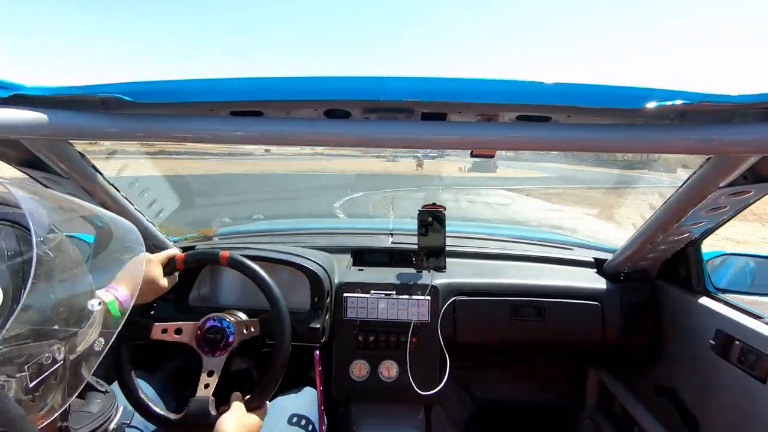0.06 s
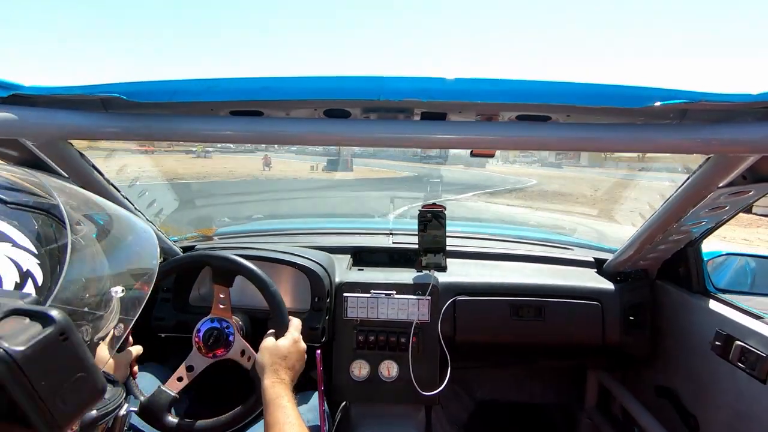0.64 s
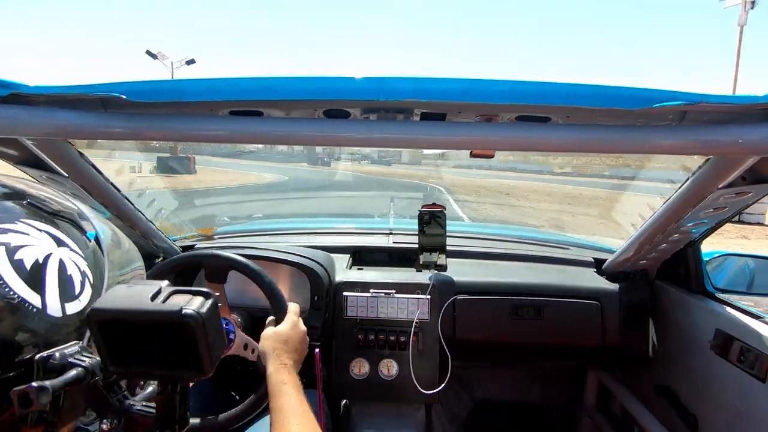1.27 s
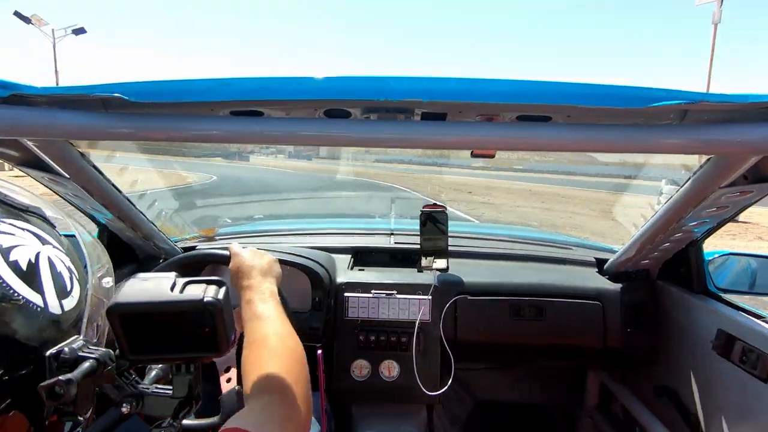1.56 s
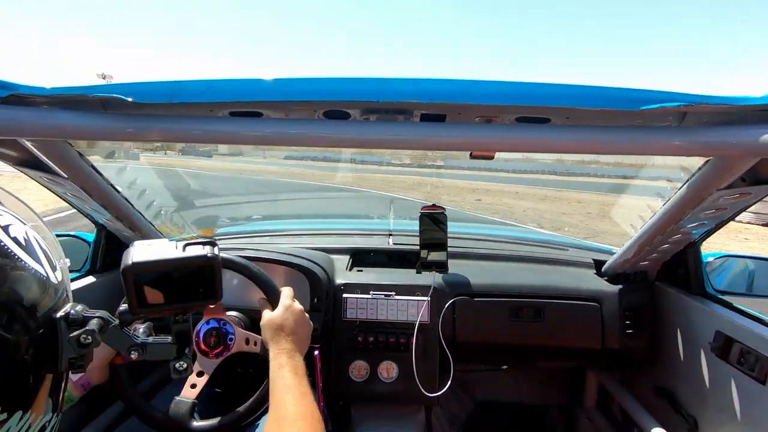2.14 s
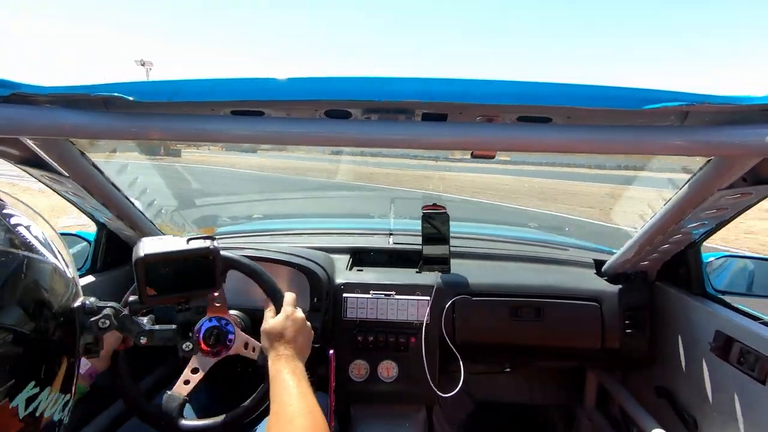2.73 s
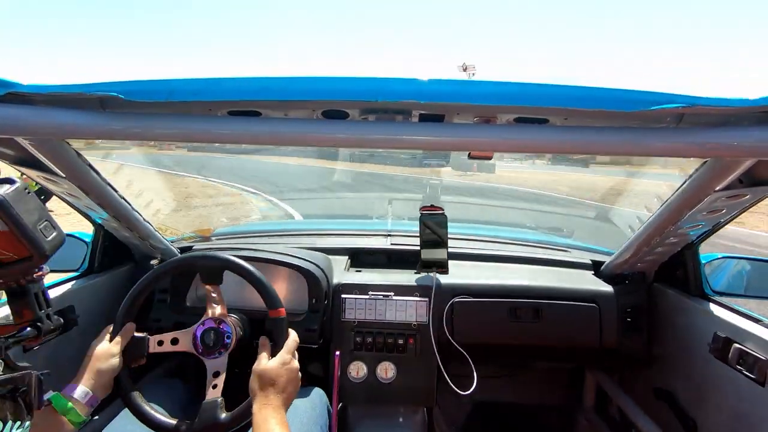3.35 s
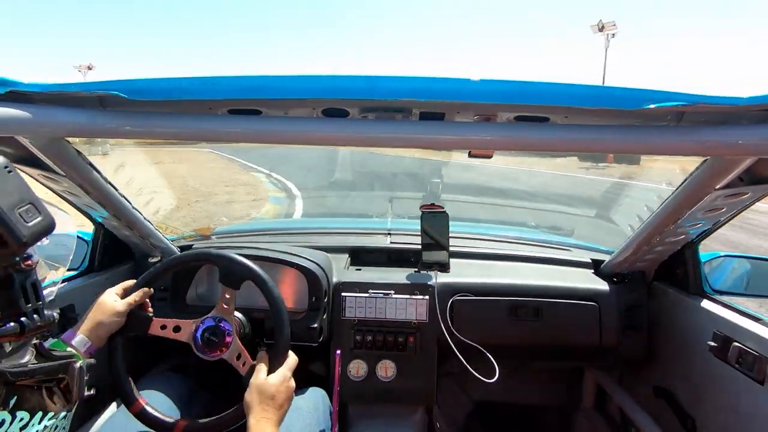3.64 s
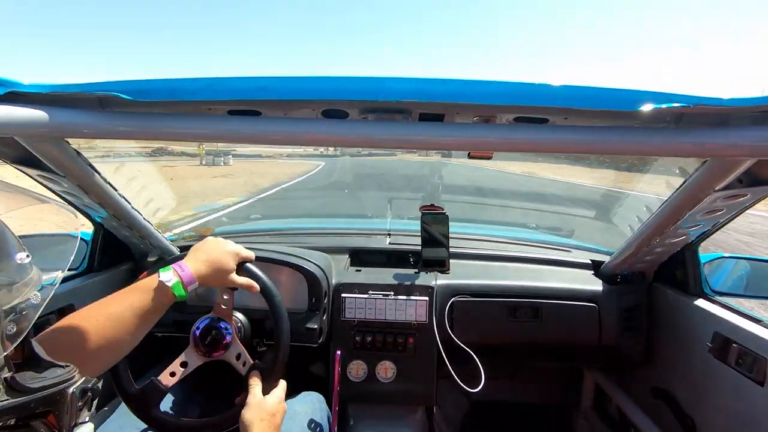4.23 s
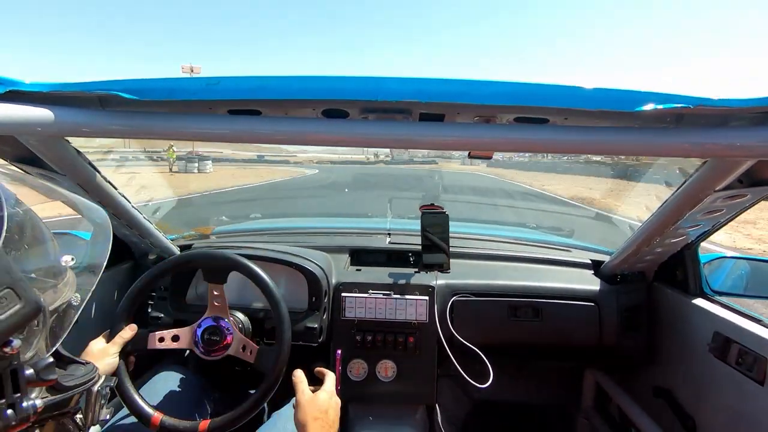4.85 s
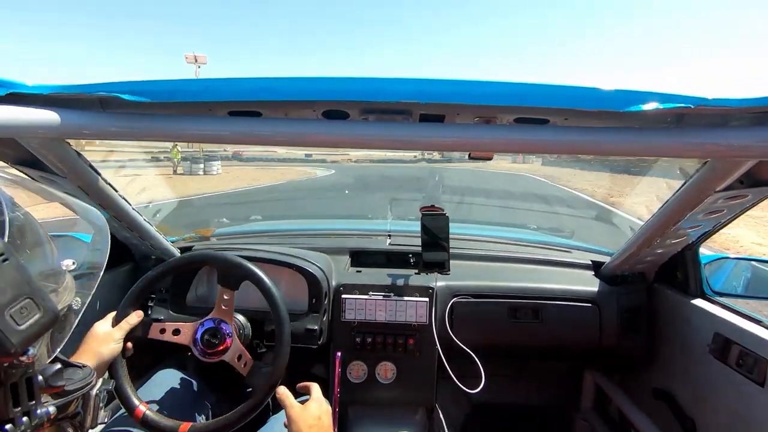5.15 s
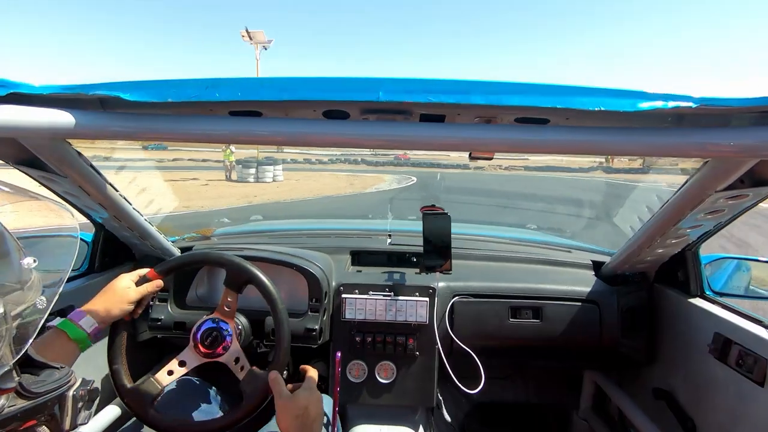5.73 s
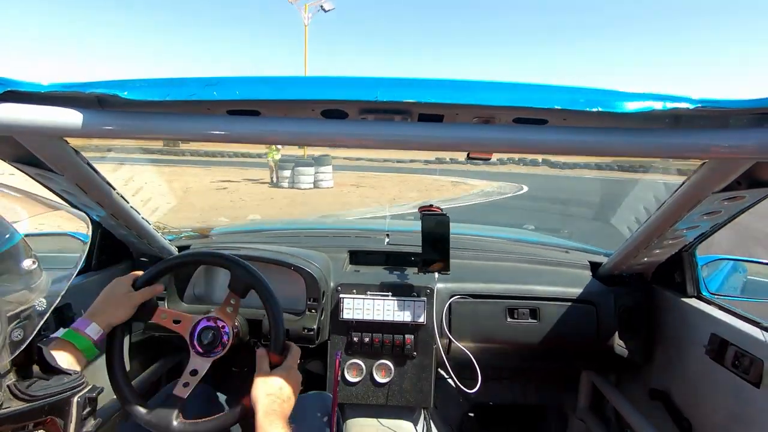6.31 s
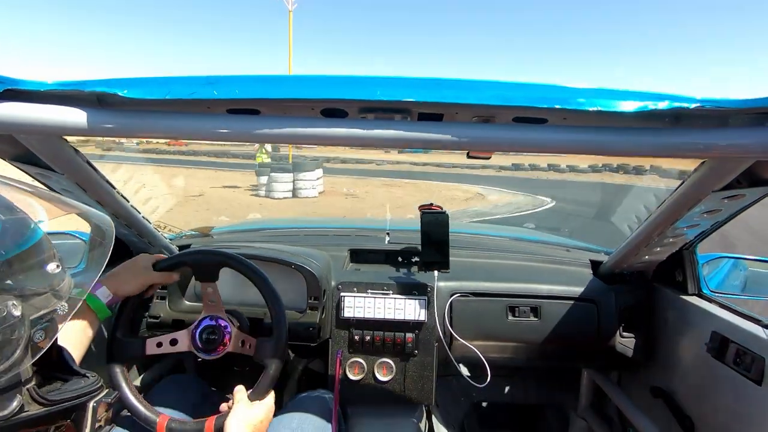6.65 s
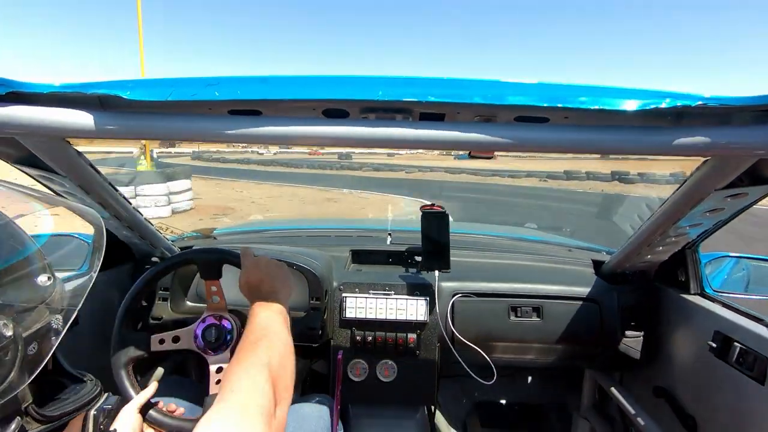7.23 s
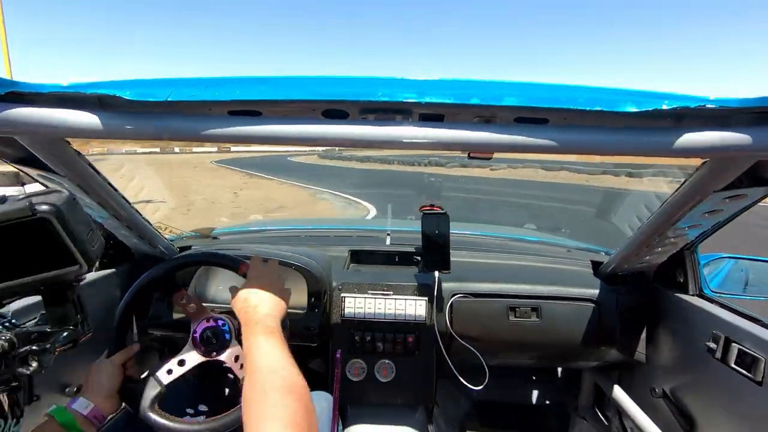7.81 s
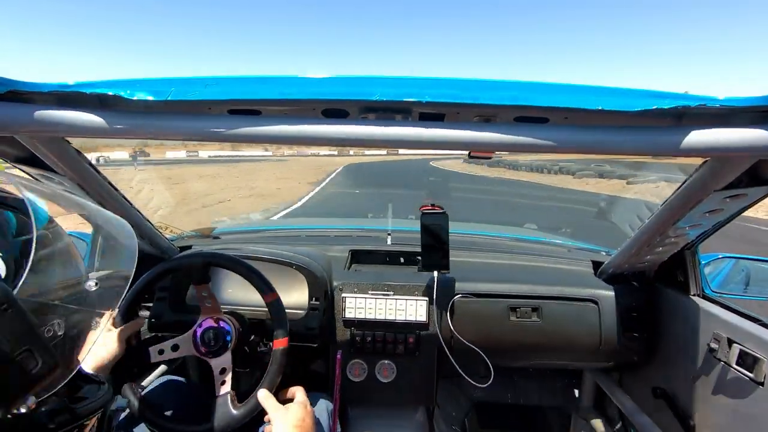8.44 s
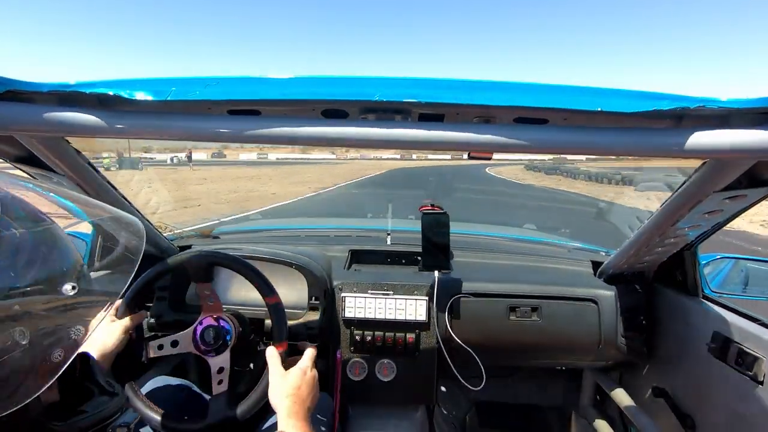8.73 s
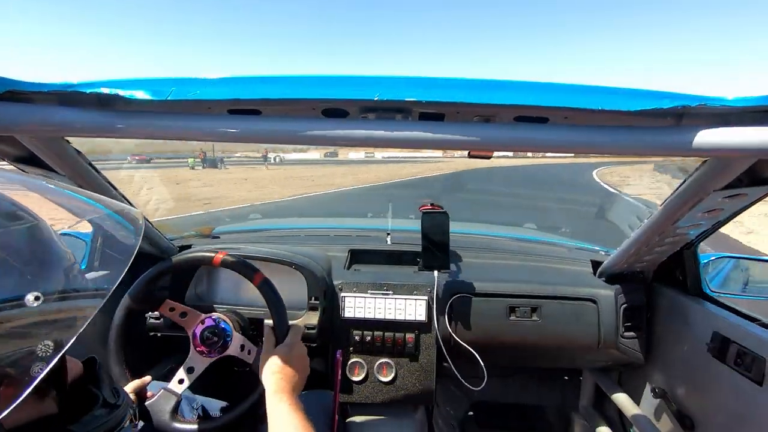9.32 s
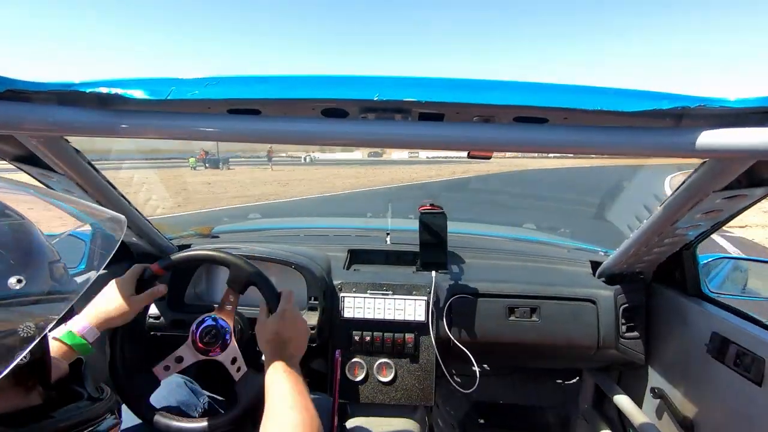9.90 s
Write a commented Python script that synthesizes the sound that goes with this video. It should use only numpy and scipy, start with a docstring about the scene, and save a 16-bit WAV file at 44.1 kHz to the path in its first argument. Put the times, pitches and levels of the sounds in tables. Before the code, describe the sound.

A V8 engine revs up and drops back again and again, heard from behind the seats of a stripped drift car. The rear tyres howl almost constantly, their wavering pitch following the revs. The longest, highest climb ends just past halfway in a stumbling, burbling drop with a few dull knocks, then three shorter throttle bursts follow. Road rumble, rushing air and faint rattles lie underneath.

```python
"""A V8 climbs and drops back through a string of slides, tyres howling, heard inside a stripped drift car.
The firing tone and uneven exhaust pulses sweep through exhaust and cabin resonances.
The spinning rear tyres stick and slip, their pitch following wheel speed and side load.
Beneath are road rumble and rushing air; loose gear ticks now and then."""
import sys
import numpy as np
from scipy import signal
from scipy.fft import rfft, irfft, next_fast_len
from scipy.io import wavfile
from scipy.ndimage import uniform_filter1d, minimum_filter1d

SR = 44100
rng = np.random.default_rng(int(sys.argv[2]) if len(sys.argv) > 2 else 0)


def store_wav(level_fs):
    """Save 16-bit WAV to argv[1]."""
    pcm = np.round(np.clip(np.atleast_2d(level_fs), -1, 1) * 32767)
    wavfile.write(sys.argv[1], SR, pcm.T.astype(np.int16))


N = 439677
TIME = np.arange(N) / SR
BINS_HZ = np.fft.rfftfreq(N, 1 / SR)
CYLINDERS, REF_FIRING_HZ = 8, 280

# throttle pushes: open/s, lift/s, firing at open/Hz, at lift/Hz, climb tau/s, fall tau/s, overrun/dB
REVS = [(0, .18, 246.6, 272.5, 0.42, 0.28, 1), (0.621, 1.42, 168.5, 288.1, 0.54, .084, -14),
        (1.669, 2.99, 280.3, 364, 1.426, 0.24, 1), (3.621, 5.92, 217.5, 389.7, 1.132, 0.25, 0.5),
        (6.84, 7.82, 147.2, 311.9, .64, .2, 1.5), (8.331, 8.92, 215.5, 296.4, 0.43, .16, -3.5),
        (9.452, 9.969, 198.5, 296.5, 0.84, .17, 0)]
# tyre pitch bend from side load: t/s, shift/Hz
SIDE_LOAD = [(0, 25), (.6, -10), (1, 25), (1.4, 20), (2, 62), (2.5, 55), (3.15, 42), (3.7, -25), (4.2, -12),
             (5.2, -8), (6.08, -15), (6.22, -140), (6.5, -75), (6.8, -20), (7.15, -45), (7.5, 0), (7.9, 10),
             (8.4, 0), (9.1, 20), (9.4, -4.5), (9.8, 41)]


def amp(db):
    """Decibels to gain."""
    return 10 ** (np.asarray(db) / 20)


def unit(x):
    """Scale to rms 1."""
    return x / np.sqrt(np.mean(abs(x) ** 2) + 1e-20)


def follow(points):
    """Breakpoints to a curve in time."""
    return np.interp(TIME, *np.transpose(points))


def swell(at_s, half_s, order=2):
    """Bell of height 1; a higher order flattens the top."""
    return np.exp(-abs((TIME - at_s) / half_s) ** order)


def db_at(points, hz):
    """Spectrum value, interpolated in log frequency."""
    f, db = np.transpose(points)
    return np.interp(np.log(hz + 1), np.log(f), db)


def colour(x, points):
    """Filter by a spectrum: f/Hz, gain/dB."""
    size = next_fast_len(N)
    return irfft(rfft(x, size) * amp(db_at(points, np.fft.rfftfreq(size, 1 / SR))), size)[:N]


def noise(points):
    """Coloured noise, rms 1."""
    return unit(colour(rng.standard_normal(N), points))


def wander(rate_hz):
    """Smooth random curve, rms 1, up to about rate_hz."""
    count = 8192
    spectrum = rfft(rng.standard_normal(count)) / (1 + (BINS_HZ[:count // 2 + 1] / rate_hz) ** 4)
    return unit(np.interp(TIME, np.linspace(0, TIME[-1], count), irfft(spectrum)))


def resonate(x, hz, width_hz):
    """Unity-gain resonance."""
    turn = np.exp(2j * np.pi * np.cumsum(hz * np.ones(N)) / SR)
    pole = np.exp(-np.pi * width_hz / SR)
    return 2 * (turn * signal.lfilter([1 - pole], [1, -pole], x / turn)).real


def road():
    """Road rumble under a steady cabin roar."""
    # rumble: t/s, level/dB
    rumble_levels = [(0, -32.5), (1, -35), (2, -28), (2.8, -34), (3.6, -24.5), (4.4, -32), (5.8, -25),
                     (6.9, -29.5), (7.4, -26.5), (7.8, -30), (8.1, -23.5), (8.6, -29), (9.3, -19.5),
                     (9.97, -33.5)]
    # spectra: f/Hz, density/dB
    rumble_spectrum = [(12, -22.5), (25, -8.5), (40, 5), (55, 6), (75, 3), (110, -3.5), (200, -20.5),
                       (500, -76)]
    roar_spectrum = [(50, -21.5), (110, -11), (170, -5), (240, -9), (310, -6.5), (375, -16.5), (470, -8),
                     (535, -13), (620, -3.5), (720, -8.5), (830, -6.5), (1030, -19), (1300, -38),
                     (3000, -74)]
    rumble = amp(follow(rumble_levels) + 1.5) * noise(rumble_spectrum)
    return rumble + amp(-21 + wander(28)) * noise(roar_spectrum)


def rush(angle, air_db):
    """Air and tread hiss, pulsing with the engine and ringing the panels."""
    # hiss: f/Hz, density/dB
    hiss_spectrum = [(500, -15.5), (1000, 0), (1600, -1), (2150, -2.5), (2450, -6), (3400, -10),
                     (4200, -16), (5200, -20.5), (6200, -33), (8000, -38.5), (9300, -52), (11000, -56.5),
                     (12300, -57.5), (15000, -70)]
    # panel modes: f/Hz, width/Hz, gain/dB
    panels = [(1170, 91, -6.5), (1420, 120, -5), (1620, 80, 2), (1898, 70, 5), (2140, 27, -7)]
    pulsing = 1 + .065 * np.cos(CYLINDERS * angle) + .049 * np.cos(CYLINDERS / 2 * angle)
    hiss = noise(hiss_spectrum) * pulsing * amp(air_db + 8 + 1.1 * wander(22))
    return hiss + sum(amp(db - 3.5) * resonate(hiss, hz, width_hz) for hz, width_hz, db in panels)


def whistle(hz=1205, width_hz=35):
    """Thin breathy tone of fixed pitch."""
    # whistle: t/s, level/dB
    levels = [(0, -43), (.3, -29), (.42, -37), (.7, -35), (1.15, -42.5), (1.3, -65)]
    breath = resonate(rng.standard_normal(N), hz, width_hz)
    return amp(follow(levels)) * unit(resonate(breath, hz, width_hz))


def sizzle(cycle_hz, coast, air_db):
    """Fine grit that grows with revs, throttle and rushing air."""
    spectrum = [(2500, -23), (4800, 3), (6200, -4.5), (8300, -8), (10800, -21), (12200, -19),
                (15000, -31)]
    grains = rng.standard_normal(N) * amp(3 * wander(400))
    level_db = air_db - 16.2 + .37 * (cycle_hz - cycle_hz.max()) - 3.6 * coast + .9 * wander(9)
    return amp(level_db) * unit(colour(grains, spectrum))


def air(cycle_hz, angle, coast):
    """Rushing air: hiss, whistle and sizzle."""
    # rush: t/s, level/dB
    levels = [(0, -37), (0.3, -38), (0.42, -41), (0.83, -41.5), (1.3, -41), (1.75, -40), (2.44, -39.5),
              (2.94, -45), (3.3, -42), (3.75, -41), (4.1, -38), (4.4, -38.5), (5.3, -38.5), (6.13, -38),
              (6.44, -40.5), (6.75, -37.5), (7.3, -43), (7.46, -39.5), (7.57, -42), (7.8, -40), (8.75, -38),
              (8.94, -35), (9.2, -39.5), (9.4, -37), (9.97, -39)]
    air_db = follow(levels)
    return rush(angle, air_db) + whistle() + sizzle(cycle_hz, coast, air_db)


def ticks(attack_s=.002):
    """Small bright rattles of loose gear."""
    # rattles: t/s, level/dB, t60/s
    rattles = [(.27, -51, 0.19), (.952, -40, 0.04), (1.036, -36, 0.037), (1.125, -45, 0.05),
               (1.46, -44, .08), (2.449, -46, 0.046), (3.11, -48, 0.1), (3.363, -46, 0.044),
               (3.775, -44, 0.039), (4.96, -51, 0.049), (6.845, -48, 0.2)]
    spectrum = [(1500, -23), (4000, 14.5), (8000, -3), (10000, -10.5), (12000, -8.5), (15000, -14.5)]
    envelope = np.zeros(N)
    for at_s, db, t60_s in rattles:
        age_s = np.maximum(TIME - at_s, 0)
        envelope += amp(db - 60 * age_s / t60_s) * (1 - np.exp(-age_s / attack_s))
    return envelope * noise(spectrum)


def thumps(half_s=.023):
    """Bumps and exhaust burbles knock dully on the body shell."""
    # knocks: t/s, f/Hz, level/dB
    knocks = [(.335, 58.9, -18), (6.24, 226.1, -15), (6.28, 149.7, -16), (6.45, 223.3, -13.5)]
    return np.sqrt(2) * sum(amp(db) * swell(at_s, half_s) * np.sin(2 * np.pi * hz * TIME)
                            for at_s, hz, db in knocks)


def scuffs():
    """Toneless rasps of rubber dragged sideways as the car changes direction."""
    # scuffs: t/s, half length/s, level/dB
    drags = [(.3, .04, -29), (0.584, 0.093, -25), (6.734, 0.11, -35)]
    # rasp: f/Hz, density/dB
    spectrum = [(600, -30), (900, -5.5), (1050, -1.5), (1250, -11), (1600, -10), (2100, -11), (2600, -24.5),
                (6000, -56.5), (12000, -88.5)]
    return sum(amp(db) * swell(at_s, half_s) for at_s, half_s, db in drags) * noise(spectrum)


def wheel_spin(firing_hz, lag_s=.03, level_off_per_hz=.001):
    """Wheel speed as firing rate above the reference; lags the engine and levels off."""
    above_hz = np.interp(TIME - lag_s, TIME, firing_hz) - REF_FIRING_HZ
    return above_hz * (1 - level_off_per_hz * above_hz)


def tread(slip, second_db, third_db):
    """Stick-slip wave of three harmonics."""
    return unit(np.cos(slip) + amp(second_db) * np.cos(2 * slip) + amp(third_db) * np.cos(3 * slip))


def light_tyre(spin_hz, overtone_db, jitter=.07):
    """Lower, hoarser howl: the lightly loaded tread keeps losing and finding its pitch."""
    hz = 711.6 + .8 * spin_hz + .45 * follow(SIDE_LOAD)
    slip = 2 * np.pi * np.cumsum(hz * (1 + jitter * wander(59.67))) / SR
    howl = tread(slip, overtone_db - 12, overtone_db - 19.5) * amp(.64 * wander(59))
    return amp(-26.3 + .0067 * spin_hz) * unit(howl)


def loaded_tyre(angle, spin_hz, overtone_db, rib_spread=.038, jitter=.034, shake_rad=.64):
    """Each tread rib sticks and slips at its own jittery pitch, shaken by the drivetrain."""
    hz = 781 + 1.2 * spin_hz + follow(SIDE_LOAD)
    howl = np.zeros(N)
    for rib in (-1, 0, 1):
        rib_hz = hz * (1 + rib_spread * rib + jitter * wander(70.27))
        slip = 2 * np.pi * np.cumsum(rib_hz) / SR + shake_rad * np.sin(angle + np.pi * rib)
        howl += tread(slip, overtone_db - 10.5, overtone_db - 16.5)
    return amp(-23 + .0255 * spin_hz + wander(21)) * unit(howl)


def bites(jitter=.023, flicker_db=2.5, third_db=-5, smear_rad=.9):
    """A tyre bites and briefly holds a cleaner note with hoarse overtones."""
    # squeals: t/s, half length/s, f/Hz, level/dB, overtones/dB
    squeals = [(.2, 0.26, 590, -25, -11), (0.479, .06, 540, -28, -15), (0.622, .07, 625, -24, -15.5),
               (2.081, .07, 849, -22, -17.5), (2.38, .16, 918, -27, -5.5), (2.718, .1, 926, -25, -5),
               (2.88, .08, 888, -16.5, -19.5), (3.221, .07, 872, -28, -14), (3.559, .07, 690, -22, -3.5),
               (3.717, .1, 705, -20, -12), (4.438, .07, 820, -26, -10), (6.3, .05, 640, -19.5, -16),
               (6.4, .04, 600, -23, -14), (6.502, .06, 628, -22, -14), (6.679, .09, 565, -21.5, -10),
               (6.881, .11, 560, -21.5, -11.5), (7.141, .09, 638.4, -26, -11.5), (7.87, .1, 833, -25, -19),
               (8.169, .2, 638.2, -24.5, -14), (9.05, .14, 802, -23.5, -12), (9.36, 0.18, 640, -21, -9)]
    drift = 1 + jitter * wander(60)
    flicker = amp(flicker_db * wander(27))
    smear = smear_rad * wander(110)
    out = np.zeros(N)
    for at_s, half_s, hz, db, overtone_db in squeals:
        near = abs(TIME - at_s) < 2 * half_s
        slip = 2 * np.pi * np.cumsum(hz * drift[near]) / SR
        hoarse = slip + smear[near]
        overtones = np.cos(2 * hoarse) + amp(third_db) * np.cos(3 * hoarse)
        note = unit(np.cos(slip) + amp(overtone_db) * overtones)
        out[near] += amp(db) * swell(at_s, half_s, order=4)[near] * note
    return out * flicker


def cabin(x, t60_s=.1, wet=.49, crossfade_hz=1.299, patterns=3):
    """Dense cabin reflections; several echo patterns slowly crossfade so no single pitch rings."""
    t, echoes = TIME[:SR // 8], np.zeros(N)
    for k in range(patterns):
        taps = rng.standard_normal(len(t)) * amp(-60 * t / t60_s) * (t > .002)
        share = np.sqrt(2 / patterns) * np.cos(np.pi * (crossfade_hz * TIME + k / patterns))
        echoes += signal.oaconvolve(x * share, taps / np.linalg.norm(taps))[:N]
    return (x + wet * echoes) / np.hypot(1, wet)


def tyres(firing_hz, angle):
    """Both rear tyres howl through the wheel wells, brightening over time."""
    # wheel wells to cabin: f/Hz, gain/dB
    path = [(370, -22), (470, -4), (545, 3), (625, 3.5), (690, 0), (820, 2), (930, -1.5), (1040, -9),
            (1260, 5), (1400, -0.5), (1620, -0.5), (1720, -0.5), (1850, 5), (2020, -1), (2140, 2),
            (2350, -5.5), (4000, -18)]
    spin_hz = wheel_spin(firing_hz)
    overtone_db = -1 + .34 * TIME
    howl = loaded_tyre(angle, spin_hz, overtone_db) + light_tyre(spin_hz, overtone_db) + bites()
    return cabin(colour(howl, path))


def firing_rate():
    """Revs climb ever more slowly under throttle, then sink until the next push."""
    hz = np.zeros(N)
    for push, after in zip(REVS, [*REVS[1:], None]):
        open_s, lift_s, low_hz, top_hz, climb_s, fall_s, _ = push
        climb = 1 - np.exp(-np.clip(TIME - open_s, 0, lift_s - open_s) / climb_s)
        rev_hz = low_hz + (top_hz - low_hz) * climb / climb[-1]
        if after is not None:
            next_open_s, _, next_low_hz, *_ = after
            age = np.clip(TIME - lift_s, 0, next_open_s - lift_s) / fall_s
            fall = 1 - (1 + age) * np.exp(-age)
            rev_hz += (next_low_hz - top_hz) * fall / fall[-1]
        hz = np.where(TIME >= open_s, rev_hz, hz)
    return hz


def coasting(firing_hz, onset_hz_per_s=40, span_hz_per_s=75, ease_s=.08, lead_s=.032):
    """0 under load, 1 with the throttle shut and revs sinking fast."""
    sink_hz_per_s = -np.gradient(firing_hz) * SR
    shut = np.clip((sink_hz_per_s - onset_hz_per_s) / span_hz_per_s, 0, 1)
    return np.interp(TIME + lead_s, TIME, uniform_filter1d(shut, size=round(ease_s * SR)))


def stumbling():
    """Depth of the engine's stumble as the throttle shuts or reopens."""
    # stumbles: t/s, half length/s, depth/0-1
    stumbles = [(.345, 0.033, 1), (.575, 0.024, 0.4), (3.136, .04, 0.9), (3.254, 0.039, 0.22),
                (3.56, 0.052, 0.8), (6.098, 0.042, 0.9), (6.22, 0.021, 0.54), (6.317, 0.058, 1),
                (6.7, .09, 0.4), (7.957, .04, 0.7), (8.96, 0.031, 0.55)]
    return sum(depth * swell(at_s, half_s) for at_s, half_s, depth in stumbles)


def misfires(angle, stumble, level_db=-22.5, uneven_db=2.2):
    """In a stumble, firings pop down the exhaust with random strength."""
    spectrum = [(40, -12.5), (170, -.5), (260, .5), (380, -17.5), (620, -15), (1500, -45.5),
                (6000, -100)]
    fired = np.diff(np.floor(CYLINDERS * angle / (2 * np.pi)), prepend=0)
    pops = fired * rng.standard_normal(N) * amp(uneven_db * wander(30))
    return amp(level_db) * stumble * unit(colour(pops, spectrum))


def engine_levels(firing_hz, coast, drone_below_hz=216):
    """Levels of firing tone, lope (uneven exhaust pulses) and overrun drone, from revs and throttle."""
    # firing tone through the exhaust resonances, throttle open and shut: f/Hz, level/dB
    open_levels = [(150, -11), (190, -12), (240, -13), (265, -14), (287, -17.5), (315, -13), (340, -17),
                   (360, -21.5), (388, -18.5)]
    shut_levels = [(150, -35), (185, -26.5), (205, -17.5), (222, -18), (240, -18), (262, -17), (290, -22.5),
                   (360, -25.5)]
    # lumpier or smoother moments: t/s, half length/s, lope gain/dB
    burbles = [(0.567, .06, 2), (0.805, 0.2, 5.5), (1.2, 0.25, 2.5), (1.623, 0.24, -3.5), (2.548, 0.3, 0.4),
               (4.95, 0.31, 1.5), (5.72, 0.36, -3), (6.272, 0.15, 8), (6.66, 0.13, 11.5), (7.195, 0.25, 6),
               (8.47, 0.13, 4.5), (9.68, 0.12, 3)]
    overrun_db = np.zeros(N)
    for open_s, lift_s, *_, db in REVS:
        overrun_db[TIME >= (open_s + lift_s) / 2] = db
    shut_db = db_at(shut_levels, firing_hz) + overrun_db + 2 * wander(25)
    firing_db = (1 - coast) * db_at(open_levels, firing_hz) + coast * shut_db
    lope_db = -27.5 + .0671 * (firing_hz - REF_FIRING_HZ) + coast * (overrun_db - 4)
    lope_db += sum(db * swell(at_s, half_s) for at_s, half_s, db in burbles)
    drone_db = -17 + overrun_db - 2.5 * np.maximum(firing_hz - drone_below_hz, 0)
    return firing_db, lope_db, drone_db


def engine(cycle_hz, angle, coast, stumble, stumble_db=-8.5, dispersion_rad=.7):
    """The firing tone and the orders around it sweep through exhaust and cabin resonances."""
    # exhaust orders: multiple of the cycle rate, relative level/dB
    orders = [(2, 5.5), (3, 2.5), (4, 0), (5, 3), (6, 0), (7, -4), (9, -2.5), (10, -3.5), (11, -10.5),
              (12, -5.5), (13, -2), (14, -4.5), (15, -15), (16, -1)]
    # exhaust to cabin: f/Hz, gain/dB
    path = [(60, -9), (90, -10.5), (110, -4.5), (140, -2), (178, 4), (198, 1.5), (220, 3), (260, 1.5),
            (320, -7.5), (380, -15.5), (475, 2.5), (540, -8), (620, 1.5), (780, -34)]
    # shell booms at crank rate as the throttle eases: t/s, half length/s, level/dB
    booms = [(2.851, 0.11, -17), (3.08, 0.06, -17.5), (6.04, 0.096, -15)]
    firing_db, lope_db, drone_db = engine_levels(CYLINDERS * cycle_hz, coast)
    out = amp(firing_db + stumble_db * stumble + 1.1 * wander(10)) * np.cos(CYLINDERS * angle)
    out += coast * amp(drone_db + 1.2 * wander(20)) * np.sin(6 * angle)
    out += sum(amp(db) * swell(at_s, half_s) for at_s, half_s, db in booms) * np.sin(2 * angle)
    rasp_db = lope_db + .21 * (firing_db - lope_db) - 3
    for order, db in orders:
        level_db = (lope_db if order < CYLINDERS else rasp_db) + db + db_at(path, order * cycle_hz)
        # the pipe smears pulses into chirps; unequal burns make the orders flutter
        lag_rad = dispersion_rad * (order - CYLINDERS / 2) ** 2 + .25 * wander(62)
        out += amp(level_db + 1.85 * wander(7.3)) * np.cos(order * angle + lag_rad)
    return -np.sqrt(2) * out


def scene():
    """Engine, tyres, road and air from behind the seats, mono."""
    firing_hz = firing_rate()
    coast, stumble = coasting(firing_hz), stumbling()
    cycle_hz = firing_hz / CYLINDERS * (1 + (.0034 + .008 * coast) * wander(17))
    angle = 2 * np.pi * np.cumsum(cycle_hz) / SR  # one turn per four-stroke cycle
    motor = engine(cycle_hz, angle, coast, stumble) + misfires(angle, stumble)
    rubber = tyres(firing_hz, angle) + scuffs()
    background = road() + air(cycle_hz, angle, coast) + thumps() + ticks()
    return (motor + rubber + background)[None]


def record(dry, threshold_db=-13, ceiling=.88, cutoff_hz=15200):
    """Fast gain control, peak limiter, low-pass."""
    power = uniform_filter1d(uniform_filter1d(dry[0] ** 2, size=900), size=700)
    over_db = np.maximum(10 * np.log10(abs(power) + 1e-12) - threshold_db, 0)
    levelled = dry * amp(.6 - .35 * over_db) * signal.windows.tukey(N, .0002)
    limit_gain = minimum_filter1d(ceiling / np.maximum(abs(levelled), ceiling), size=300)
    limited = levelled * uniform_filter1d(uniform_filter1d(limit_gain, size=150), size=150)
    lowpass = signal.firwin(511, cutoff_hz, window=("kaiser", 9), fs=SR)
    return signal.oaconvolve(limited, lowpass[None], "same")


dry = scene()
out = record(dry)
store_wav(out)
```